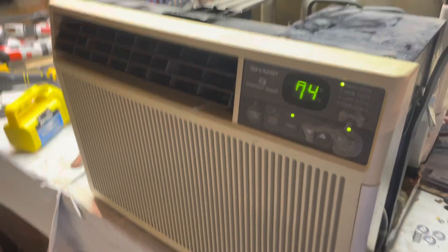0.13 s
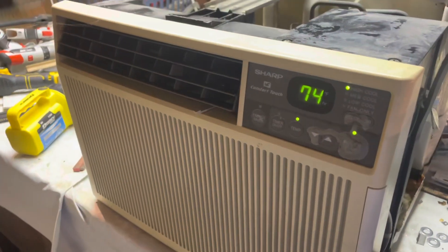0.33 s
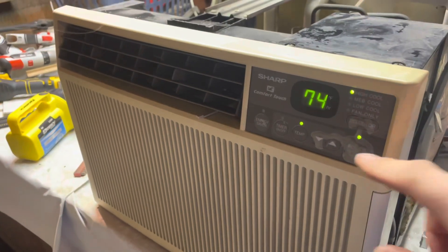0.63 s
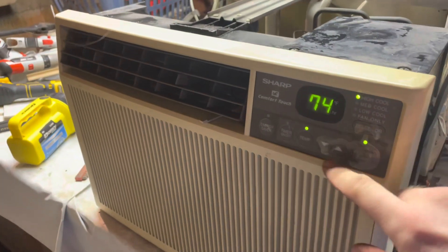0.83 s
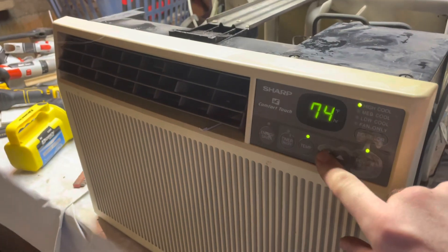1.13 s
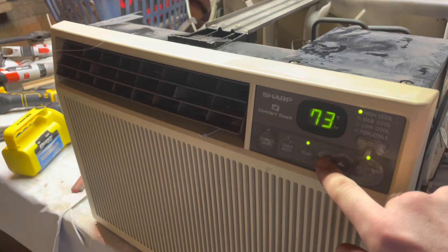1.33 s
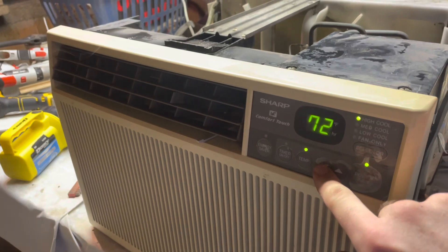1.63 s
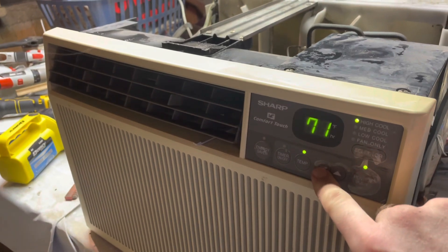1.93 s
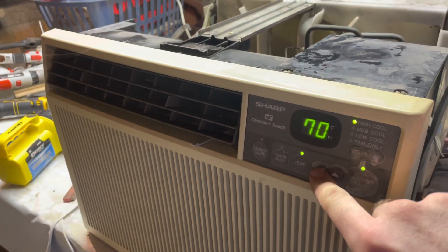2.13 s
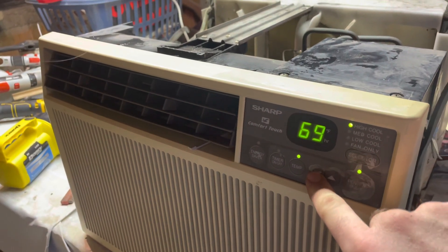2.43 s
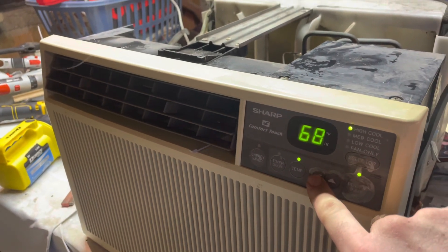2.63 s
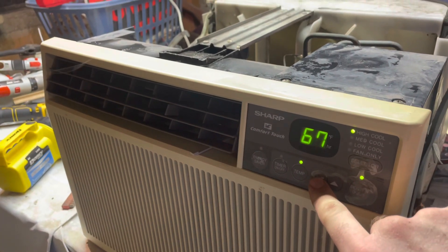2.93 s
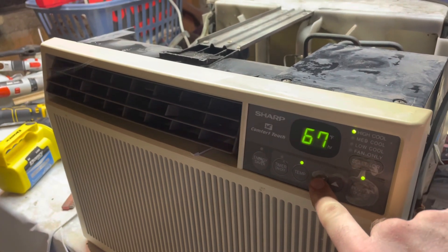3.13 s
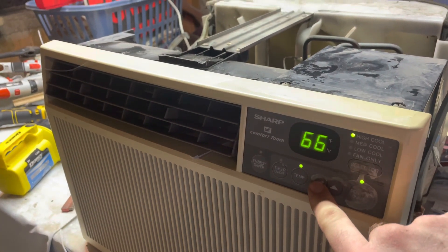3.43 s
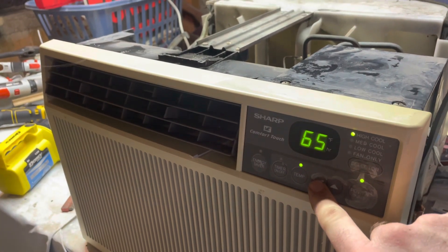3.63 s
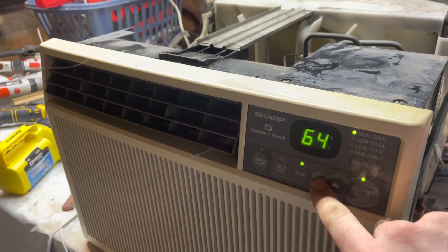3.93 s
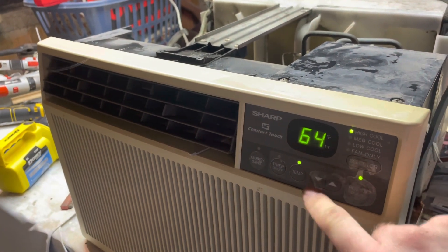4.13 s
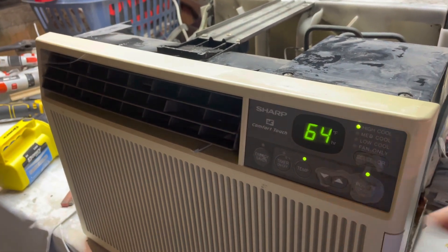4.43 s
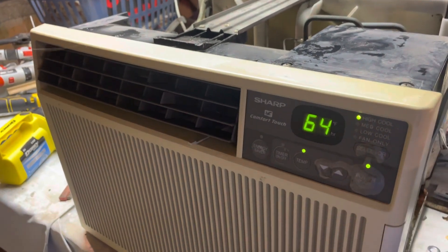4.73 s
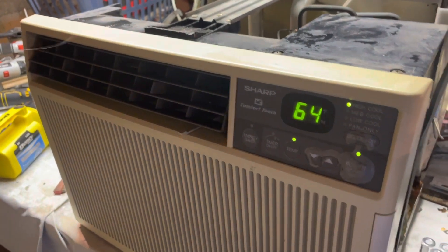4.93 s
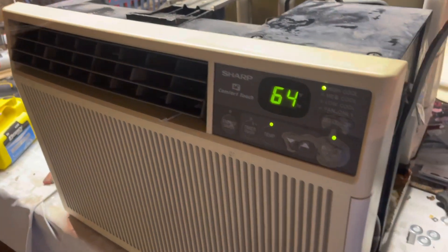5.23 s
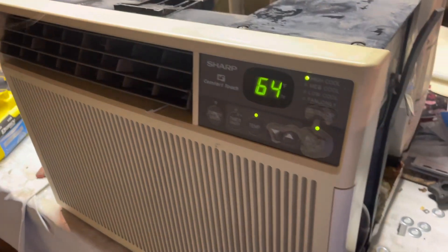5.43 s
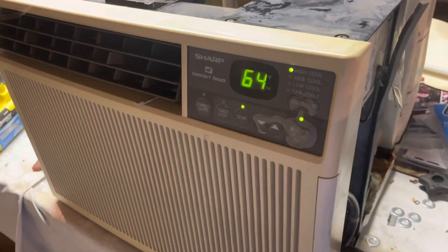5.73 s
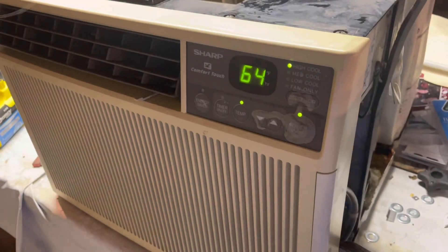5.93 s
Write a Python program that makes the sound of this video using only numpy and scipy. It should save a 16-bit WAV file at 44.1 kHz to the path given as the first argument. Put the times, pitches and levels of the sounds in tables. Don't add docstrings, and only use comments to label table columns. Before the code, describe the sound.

Continuous fan noise from an air conditioner, heard very near in stereo indoors. The hum is deep and even, with thin tonal lines above it; the air is full in the low mids and softly hissy on top, gusting gently. A low housing moan wavers underneath. Tiny crisp ticks and barely audible gritty crackle dot the hiss, then a short cluster of muted knocks arrives near the end.

```python
import sys
import numpy as np
from scipy import signal
from scipy.io import wavfile
from scipy.ndimage import uniform_filter1d

SR = 44100
rng = np.random.default_rng(int(sys.argv[2]) if len(sys.argv) > 2 else 0)


def convert_level_to_amplitude(level_db):
    exponent = np.asarray(level_db, float) / 20
    return 10 ** exponent


def digitize_waveform(pressure):
    field = np.atleast_2d(pressure).T
    bounded = np.clip(field, -1, 1)
    quanta = np.round(bounded * 32767).astype(np.int16)
    wavfile.write(sys.argv[1], SR, quanta)


N = 268789


def evened(x):
    return x / np.sqrt(np.mean(x ** 2) + 1e-20)


def read(points, hz):
    f, value = np.transpose(points)
    return np.interp(np.log(hz + 1), np.log(f + 1), value)


def drift(t, top_hz):
    rates = np.geomspace(top_hz / 20, top_hz, 16)[:, None]
    sines = np.sin(2 * np.pi * (rates * t + rng.random(rates.shape)))
    return evened((sines / np.sqrt(rates)).sum(0))


def resonances(hz, peaks):
    return sum(db / (1 + (2 * (hz - f) / width) ** 2) for f, width, db in peaks)


def motor(waver_db, waver_turns):
    tones_hz = [170.39, 202.93, 239.98, 327.16, 480.0, 511.16, 608.82, 643.68, 662.63, 883.66, 1116.99,
                1135.88]
    # (level [dB rms], left over right [dB], left ahead of right [rad])
    tones = [(-29.5, -1, -.3), (-53, 2.5, -0.31), (-20.5, -2.5, .17), (-46.5, 1.5, -0.11),
             (-50.5, 1.5, -0.063), (-52.5, 2, -0.26), (-55, 5, .36), (-53, 5, 0.45), (-62.5, 3, .41),
             (-53, 3.5, 0), (-54, 5.5, 0.6), (-63, 10, 0.27)]
    t = np.arange(N) / SR
    slow = np.arange(0, N + 200, 200) / SR
    out = np.zeros((2, N))
    for hz, (db, lean_db, lead) in zip(tones_hz, tones):
        strength = np.interp(t, slow, drift(slow, 6.9))
        wander = np.interp(t, slow, drift(slow, 1.3))
        peak = convert_level_to_amplitude(db + waver_db * np.sqrt(hz / 240) * strength) * np.sqrt(2)
        turns = hz * t + rng.random() + waver_turns * hz / 240 * wander
        for ear, sign in enumerate((.5, -.5)):
            out[ear] += peak * convert_level_to_amplitude(sign * lean_db) * np.sin(2 * np.pi * turns + sign * lead)
    return out


def rush(patchy_db, flicker_db, gust_share):
    # (frequency [Hz], density [dB per Hz])
    rush_colour = [(22, -14), (45, -7), (100, -5), (145, -2), (260, 1.5), (350, -3), (550, -9.5),
                   (900, -13.5), (1350, -16.5), (2400, -25.5), (5300, -33), (5500, -37), (8600, -39),
                   (15600, -50.5)]
    cavities_hz = [125, 143, 212, 335, 458, 940, 1130, 1350, 2000, 2332, 2450, 10000, 13500]
    # (width [Hz], height over the rush [dB])
    cavities = [(24.8, 4.5), (11.6, -2.5), (19.2, -6), (20, 3.5), (24.9, 2), (100, -2.5), (97, 1),
                (198, 2.5), (302, 1), (39.8, 4.5), (250, -3.5), (1300, -2), (1700, 3)]
    # (centre [Hz], width [Hz], height [dB])
    port_peaks = [(7450, 500, 3.5), (8500, 500, -2.5), (8970, 190, 8), (9500, 600, -1.5)]
    # (frequency [Hz], likeness [0-1])
    port_likeness = [(30, 0.9), (300, 0.98), (450, 0.81), (750, 0.46), (1100, .63), (1650, 0.14),
                     (2100, 0.7), (3200, 0.56), (4200, 0.37), (6900, 0.75), (8400, 0.92), (9800, 0.78),
                     (11800, 0.43), (13000, 0.94)]
    # (frequency [Hz], left over right [dB])
    port_lean = [(60, -1), (92, 0), (140, 0), (210, 3), (330, -3), (500, -0.5), (770, 0.5), (1170, 1.0),
                 (1790, -0.5), (2740, 3), (4190, 4), (6410, 0), (9810, 1), (15000, -1)]
    # (frequency [Hz], left ahead of right [rad])
    port_lead = [(20, 0), (1980, 0), (3100, 1.2), (3960, .6), (5080, .8), (5770, -1.5), (6720, -.9),
                 (7900, -3.0), (9000, -3.14), (10000, -3.3), (11000, -4.7), (12000, -5.9), (12800, -6.28)]
    # (time [s], level [dB])
    stream = [
        (0, 2.5),
        (.3, -1),
        (1.4, .5),
        (2.6, 0.5),
        (3.7, 1.5),
        (4.5, 0),
        (5.1, 1.5),
        (5.5, 1.5),
        (5.95, 2),
        (6.1, 0),
    ]
    size, hop = 4096, 1024
    frames = N // hop + 5
    hz = np.fft.rfftfreq(size, 1 / SR)
    t = np.arange(frames) * hop / SR

    a, b, c, d, patches = rng.standard_normal((frames, len(hz), 5)).T
    patches = evened(uniform_filter1d(uniform_filter1d(patches, 40, 0), 3, 1))

    colour_db = read(rush_colour, hz)
    colour_db += resonances(hz, [(f, width, db) for f, (width, db) in zip(cavities_hz, cavities)])
    colour_db += resonances(hz, port_peaks)

    s, stream_db = np.transpose(stream)
    mid_db = gust_share * np.interp(t, s, stream_db - stream_db.mean())
    low_db = 0.15 * mid_db + 0.3 * drift(t, 3.0)
    low_share = np.exp(-(np.log((hz[:, None] + 1) / 480) / 1.2) ** 2)
    mid_share = np.exp(-(np.log((hz[:, None] + 1) / 1250) / 0.39) ** 2)
    field_db = low_share * low_db + mid_share * mid_db + patchy_db * patches

    flutter = rng.standard_normal(frames) + 0.6 * drift(t, 5.0)
    field_db += flicker_db * (hz[:, None] / 10000) * flutter

    same = np.clip(read(port_likeness, hz), 0, 1)[:, None]
    left = a + 1j * b
    right = same * left + np.sqrt(1 - same ** 2) * (c + 1j * d)
    right = right * np.exp(-1j * read(port_lead, hz))[:, None]
    lean = convert_level_to_amplitude(read(port_lean, hz) / 2)[:, None]
    spectra = np.array([left * lean, right / lean]) * convert_level_to_amplitude(colour_db[:, None] + field_db)
    air = signal.istft(spectra, nperseg=size, noverlap=size - hop)[1][:, :N]
    return convert_level_to_amplitude(-29) * evened(air)


def moan(trim_db, lean_db, flutter_db):
    # (middle [s], length [s], peak level [dB rms], pitch [Hz])
    eddies = [(.26, .3, -30, 128.3), (0.558, 0.27, -33, 127), (1.318, 0.14, -35.5, 124.6),
              (1.74, 0.32, -31, 127), (2.04, .16, -32.5, 125.4), (2.38, 0.2, -35.5, 127.7),
              (2.644, 0.17, -32, 123.8), (3.002, .16, -31, 125.8), (3.691, .18, -29.5, 124.2),
              (4.02, 0.18, -35, 127.5), (4.554, 0.15, -38.5, 121.7), (4.8, .14, -40, 123),
              (5.16, 0.19, -33, 121.8), (5.491, 0.21, -36.5, 126.5), (5.781, 0.18, -34, 124.8)]
    rest = convert_level_to_amplitude(-44)
    t = np.arange(N) / SR
    level = rest
    for middle, length, db, _ in eddies:
        level = level + np.maximum(convert_level_to_amplitude(db) - rest, 0) * np.exp(-(2 * (t - middle) / length) ** 2)
    middles, _, _, pitches_hz = np.transpose(eddies)
    turns = np.cumsum(np.interp(t, middles, pitches_hz)) / SR
    flutter = convert_level_to_amplitude(trim_db + flutter_db * drift(t, 14.0))
    tone = np.sqrt(2) * level * flutter * np.sin(2 * np.pi * turns)
    return tone * convert_level_to_amplitude(np.array([[lean_db / 2], [-lean_db / 2]]))


def crackle(per_s, spread_db, level_db, low_hz):
    struck = rng.random(N) < per_s / SR
    hits = convert_level_to_amplitude(spread_db * np.minimum(rng.exponential(1, N), 3)) * struck
    grain = rng.standard_normal(64) * np.exp(-np.arange(64) / 14)
    top = signal.butter(4, low_hz, "highpass", fs=SR, output="sos")
    return convert_level_to_amplitude(level_db) * evened(signal.sosfilt(top, np.convolve(hits, grain)[:N]))


def taps(events, rise_s, t60_s, echo_s, echo_db, trim_db):
    t = np.arange(2000) / SR
    out = np.zeros(N + 4000)
    for s, db, hz in events:
        ring = (1 - np.exp(-t / rise_s)) * convert_level_to_amplitude(-60 * t / t60_s) * np.sin(2 * np.pi * hz * t)
        ring *= convert_level_to_amplitude(db + trim_db) / abs(ring).max()
        for at, gain in ((s, 1), (s + echo_s, convert_level_to_amplitude(echo_db))):
            out[round(at * SR):][:2000] += gain * ring
    return out[:N]


def fingertip_ticks():
    # (time [s], peak level [dB])
    touches = [(0.1376, -48.5), (0.2162, -46.5), (0.2438, -44.5), (0.298, -40), (0.411, -43.5),
               (0.4863, -44.5), (0.539, -46.5), (0.689, -46), (0.8858, -43), (0.9218, -43), (0.9485, -48),
               (1.0425, -44), (1.2572, -44.5), (1.3882, -48.5), (1.704, -49), (1.7968, -47.5),
               (2.3027, -45.5), (2.3298, -44.5), (2.9587, -46.5), (3.021, -43), (3.0644, -44.5),
               (3.165, -45), (3.2022, -45.5), (3.2525, -45), (4.389, -40), (4.4867, -48), (5.1562, -49),
               (5.54, -47), (6.048, -45.5)]
    lag_s = .0015
    rings_hz = 13350 * (1 + .035 * rng.standard_normal(len(touches)))
    events = [(s + lag_s, db, hz) for (s, db), hz in zip(touches, rings_hz)]
    return taps(events, rise_s=.0001, t60_s=.002, echo_s=.0012, echo_db=-4.0, trim_db=2.0)


def housing_knocks():
    # (time [s], peak level [dB], ring [Hz])
    knocks = [
        (5.82, -44, 1200),
        (5.87, -45, 1270),
        (5.914, -38, 1295),
    ]
    return taps(knocks, rise_s=0.0033, t60_s=0.037, echo_s=0.0041, echo_db=-13, trim_db=8.5)


def scene():
    hum = motor(waver_db=0.56, waver_turns=0.011)
    air = rush(patchy_db=1.0, flicker_db=1.23, gust_share=1.0)
    air += moan(trim_db=-3.5, lean_db=-2.0, flutter_db=2.5)
    grit = crackle(per_s=60., spread_db=3.5, level_db=-73.0, low_hz=10400)
    return hum + air + grit + fingertip_ticks() + housing_knocks()


def roll_off(x):
    return signal.sosfilt(signal.butter(12, 15720, fs=SR, output="sos"), x)


def record(dry):
    bass_cut = signal.butter(3, 42, "highpass", fs=SR, output="sos")
    heard = signal.sosfilt(bass_cut, dry)
    return roll_off(heard)


dry = scene()
out = record(dry)
digitize_waveform(out)
```